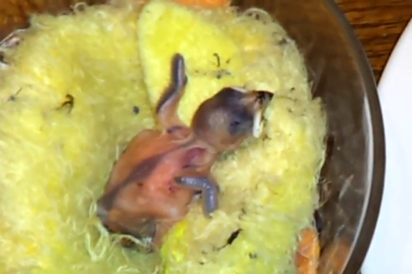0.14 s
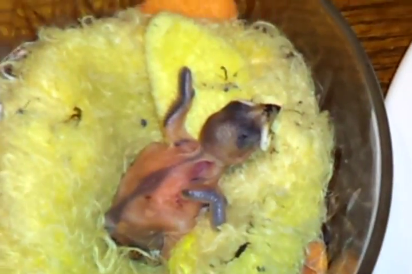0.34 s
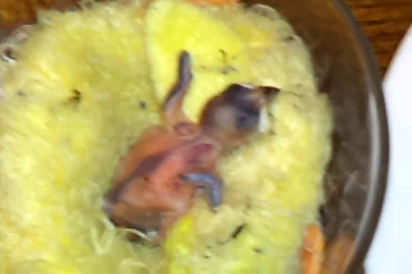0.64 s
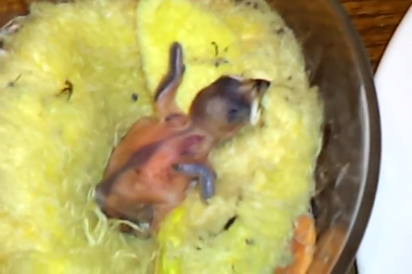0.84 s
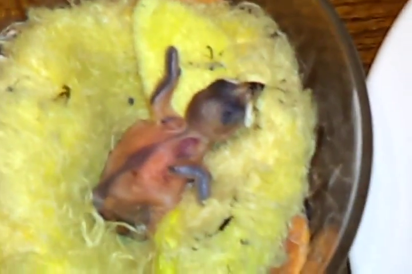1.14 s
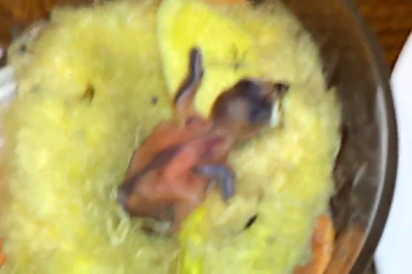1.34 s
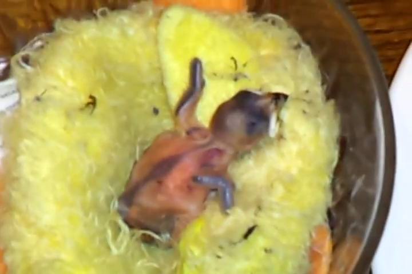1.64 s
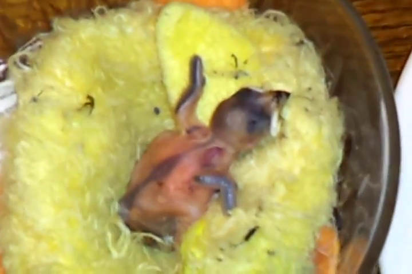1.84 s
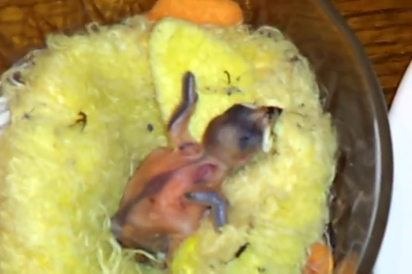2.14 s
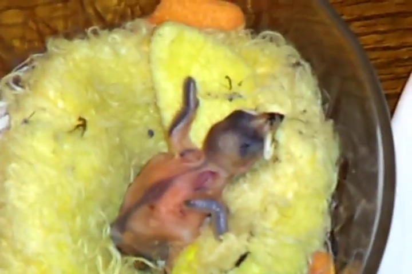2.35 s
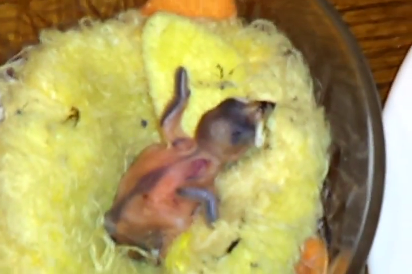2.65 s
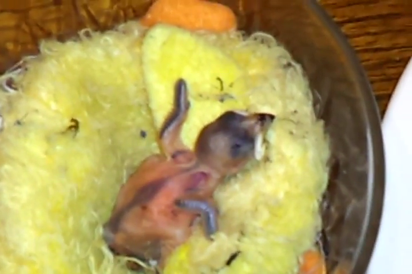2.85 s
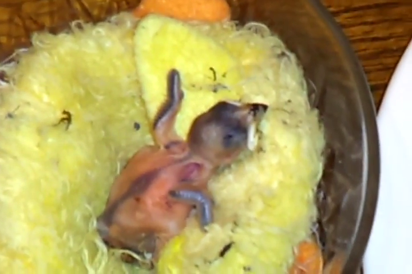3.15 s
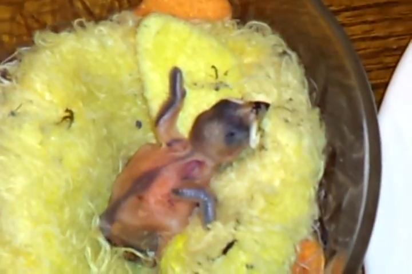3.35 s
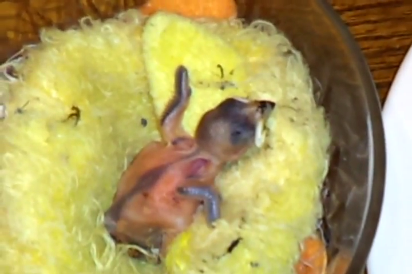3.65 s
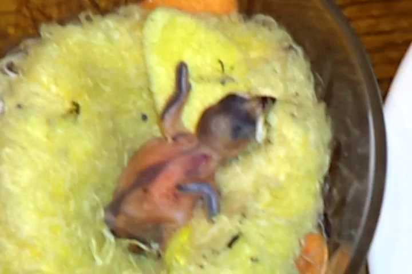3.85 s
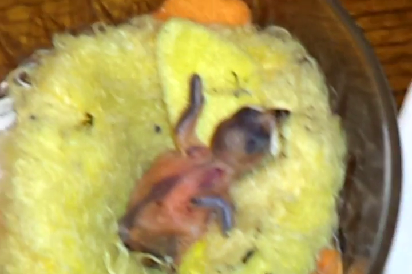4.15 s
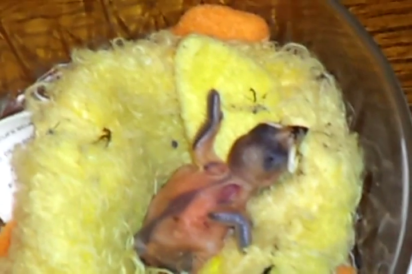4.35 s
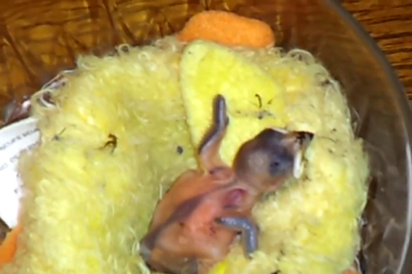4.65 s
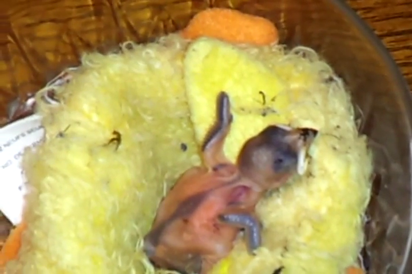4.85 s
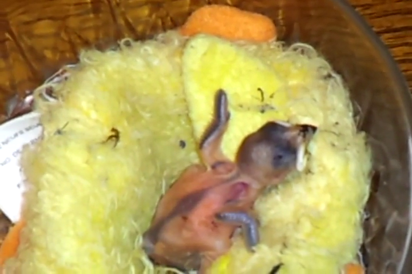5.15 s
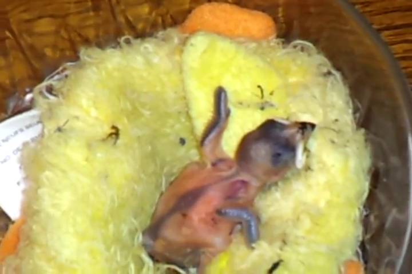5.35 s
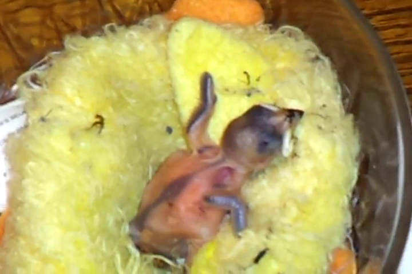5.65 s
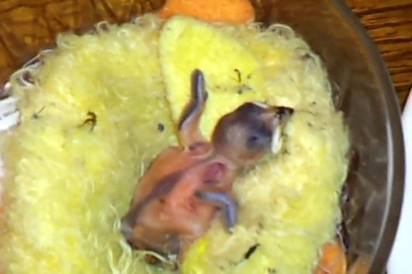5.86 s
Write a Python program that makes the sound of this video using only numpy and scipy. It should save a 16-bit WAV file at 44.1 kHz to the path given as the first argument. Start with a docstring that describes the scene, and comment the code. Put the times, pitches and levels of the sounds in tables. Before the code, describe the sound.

Close up in a hissy, humming room, a spoon strikes a small china dish with loud, bright, overloaded clinks. A nestling gives short, thin peeps about once a second. Dry ticks and a harsh scratch follow, then a busy patch of softer clinks, scrapes and wooden table knocks. Near the end comes another hard clink, then a scrape and a utensil set down with a knock.

```python
"""Spoon and china dish on a table

A spoon clinks, trembles and scrapes in a small dish, heard as dying modes excited by contact forces.
Knocks ring a wooden table; dry ticks and scratches close by are short band-limited snaps.
A nestling bird whistles thin, two-voiced peeps; hiss and a wavering hum fill the reflecting room.
The hardest clinks overload the recorder, which clips and band-limits them.
"""
import sys
import numpy as np
from scipy import signal
from scipy.fft import rfft, irfft, next_fast_len
from scipy.io import wavfile

SR = 44100
rng = np.random.default_rng(int(sys.argv[2]) if len(sys.argv) > 2 else 0)


def dump(signal):
    """Clip the signal to [-1, 1] and save it as 16-bit WAV at the path in sys.argv[1]."""
    limited = np.clip(np.atleast_2d(signal).T, -1, 1)
    pcm = np.round(limited * 32767).astype(np.int16)
    wavfile.write(sys.argv[1], SR, pcm)


N = 265085
RING_TIME = np.arange(SR // 2) / SR  # time axis of every ring [s]

# hum of the room: (frequency [Hz], rms level [dB], unsteadiness [ratio])
HUM_TONES = [(41.3, -43, .035), (97.2, -54.5, .8), (122.3, -47.5, 0.33), (158.5, -58, 0.87),
             (239.5, -48.5, 0.87), (332, -55, 0.8)]
# spectral shape of the hiss: (frequency [Hz], relative level [dB])
HISS_SHAPE = [(15, -11), (30, -15.5), (55, -1.5), (70, -2.5), (100, -1.5), (200, -2), (340, -0.5),
              (450, -5), (1200, -9), (1520, -6), (2000, -10.5), (4600, -8.5), (5500, -12), (7400, -35),
              (9000, -82)]
# decay of the room's reflections: (frequency [Hz], t60 [s])
ROOM_DECAY = [(200, 0.23), (1500, 0.34), (4000, 0.37), (7000, 0.33)]
# whistles of the bird, before the beak and the rasp shape them: (start [s], end [s], top pitch [Hz],
# scoop up to the top [Hz], final fall [Hz], level [dB], opening rasp [ratio])
PEEPS = [(.495, .615, 6680, 0, 2050, -37, .3), (1.315, 1.41, 6810, 0, 300, -39, 0),
         (1.35, 1.499, 6290, 80, 1580, -34.5, .05), (2.637, 2.805, 6920, 900, 1400, -36.5, .3),
         (2.637, 2.685, 6050, 200, 50, -43, .9), (2.697, 2.708, 5930, 0, 30, -30, 0),
         (2.782, 2.83, 6250, 0, 1200, -38.5, .2), (3.8635, 4.074, 6150, 600, 1150, -37, 1.2),
         (3.88, 4, 6720, 350, 200, -43, .4), (4.994, 5.04, 6080, 0, 500, -37.5, .4),
         (5.035, 5.173, 5920, 400, 200, -37.5, .4), (5.043, 5.15, 6900, 450, 450, -45, .2),
         (5.215, 5.322, 5570, 0, 70, -42, .05)]
# bands of friction noise: dry scratches close by, but the 2630 Hz row belongs to the spoon scraping the dish:
# (start [s], end [s], rms level at start [dB], rms level at end [dB], centre [Hz], width [Hz])
FRICTION_BANDS = [(1.2408, 1.2570, -6, -5, 4430, 2100), (1.05, 1.066, -42, -32, 5000, 1800),
                  (2.4985, 2.513, -28.5, -36.5, 4600, 1204), (5.82, 5.89, -31, -28, 4900, 1000),
                  (5.821, 5.885, -37, -36, 2630, 500), (5.945, 6.014, -36, -20, 4800, 1000)]
# dry ticks close by: (time [s], peak level [dB])
TICKS = [(.5994, -15.5), (.9134, -26.5), (1.0407, -24), (1.0475, -21.5), (1.076, -10), (1.309, -27),
         (1.312, -20), (2.233, -26), (2.3922, -23), (2.4047, -6), (2.473, -22.5), (5.778, -18)]
# modes of the wooden table: (frequency [Hz], level [dB], t60 [s])
TABLE_MODES = [(226.9, 1.5, 0.31), (251, -17, 0.1), (330.7, 0.5, .2), (380.6, 0, 0.14), (449, 2, 0.073),
               (534.5, -4, 0.072), (665, -10, 0.11), (817, -1.5, 0.087), (888, 3, 0.037), (965, -3, 0.05),
               (1141, -25, .1)]
# knocks on the table: (time [s], level [dB], brightness [dB/octave], wait between rebounds [s])
KNOCKS = [(2.251, -37.5, 1, .032), (2.856, -29.5, 1, .034), (3.046, -28, .5, .025), (3.154, -39, -4, .03),
          (3.3, -41, -5, .03), (3.398, -37, -3, .045), (5.887, -18.5, 11, .0175)]
# a utensil set down with the last knock: (time [s], level [dB])
SET_DOWN = (5.8868, -12.5)
# modes of that utensil: (frequency [Hz], level [dB], t60 [s])
UTENSIL_MODES = [(1480, -11, 0.13), (2006, -4, 0.08), (1997, -2, 0.045), (2410, -13, .08), (2627, 5, 0.033),
                 (2830, 5, 0.014), (3210, -5, 0.027), (3650, -11, .2), (4980, -7.5, 0.11),
                 (6100, -17, 0.049)]
# modes of the undamped dish, some in close pairs that beat: (frequency [Hz], level [dB], t60 [s])
DISH_MODES = [(1495.6, -3, 0.19), (1547, 0.5, 0.083), (1644, -21.5, 0.1), (2493, -20, 0.18),
              (2596, -13.5, 0.14), (2624, -7, 0.028), (3620, -29.5, 0.11), (4106, -9.5, 0.04),
              (4052, 0.5, 0.07), (4370, -16, 0.14), (4700, -28, .045), (4900, -21.5, 0.041),
              (4990, -15, .06), (5285, 1, 0.073), (5326, -14, .1), (5387, -16, 0.11), (6036, -10.5, 0.11),
              (6114, -13, 0.14), (6890, -16, .13), (7154, -12, 0.093)]
# faint touches of the trembling spoon; the first row stands for a faint dying ring of the dish:
# (start [s], end [s], middle level [dB], brightness [dB/octave])
FAINT_TOUCHES = [(.02, .06, -36, -5), (.89, .96, -35, -5), (1.69, 1.82, -35, -6), (2.16, 2.4, -39, 0),
                 (2.58, 2.9, -36, -2), (3.52, 3.82, -37, -1)]
# spoon dragged along the dish: (start [s], end [s], level [dB], brightness [dB/octave],
# place of contact in favour of the 4 kHz modes [dB])
SCRAPES = [(2.798, 2.887, -42, -2, 0), (2.945, 2.998, -37.5, -4.5, 1), (3.026, 3.097, -33.5, 1, 2),
           (3.135, 3.203, -32, -5, 7), (3.33, 3.346, -25, 1.6, 9), (3.419, 3.489, -32.5, -5, -1.7),
           (3.475, 3.497, -29.5, 2.8, -3), (3.609, 3.638, -30.5, 1.2, 1), (5.521, 5.541, -21, 3.5, 11),
           (5.8, 5.907, -28.5, .4, 6)]
# spoon striking the dish: (time [s], strength [dB], brightness [dB/octave],
# place of contact in favour of the 4 kHz modes [dB], contact time [s], damping by the resting spoon [dB/s])
CLINKS = [(.2652, -1, .2, 2.6, .0007, 30), (.4491, 1.5, 1.6, 4, .00045, 185),
          (.4609, -6.5, -1.2, -4.5, .0003, 127), (.8795, -30, -7, 1.5, .001, 500),
          (1.482, -19, -4, 1.5, .0016, 1500), (2.328, -31, -2, -3, .0025, 500),
          (2.947, -24.5, -6.5, -5, .0025, 195), (3.048, -37, 7, -2, .0025, 450),
          (3.156, -18.5, -7, 1.6, .0037, 800), (3.242, -28, -5, -1, .003, 500),
          (3.3287, -23, -.3, 1, .00075, 700), (3.5122, -16.5, 1.2, -6.5, .00055, 850),
          (3.6116, -28, -.8, 1.5, .0006, 400), (3.7088, -19, -5, 5, .002, 600),
          (3.7182, -19, 1, -3, .0009, 650), (3.742, -18, -9.5, 5, .0025, 400),
          (4.4224, -30, 0, -2, .0017, 800), (5.5264, 3, -4, 3.5, .0026, 2400),
          (5.804, -25, 4, -.5, .0013, 900), (5.8355, -19, -3.5, -4, .0005, 1100)]

HISS_DB = -39.5  # rms
# the pitch scoops up, holds, then bends into a steady fall
SCOOP_S, BEND_S, FALL_HZ_PER_S = .025, .011, 17000
BEAK_HZ, BEAK_WIDTH_HZ = 5450, 1500  # a whistle is loudest as it passes this resonance
# the rasp opens with a push and dies away to a nearly clear tone
RASP_S, CLEAR_ROUGH, RASP_PUSH_DB, PUSH_S = .075, .04, 6, .012
TICK_HZ, TICK_T60_S = 4650, .0035  # of a tick at -10 dB
TICK_HZ_PER_DB, TICK_STRETCH_DB = 20, 14  # weaker ticks are higher, and twice as long per TICK_STRETCH_DB
REBOUND_DB, REBOUND_DULLING_DB = -6, 6.5  # first rebound; dulling of each one, per octave
USUAL_CONTACT_S = .001
CRACK_DB, SECOND_MODES_DB, TOP_MODES_DB = -12, 0, -12  # at the usual contact time
SHARP_CRACK_DB, SHARP_SECOND_DB, SHARP_TOP_DB = 5.5, 3, 6.2  # added by each halving of the contact time
PLACE_TRADE = .8  # share of the gain at 4 kHz that the 5.3 kHz modes lose
TOUCHES_PER_S, TOUCH_SPREAD_DB, TOUCH_PLACE_DB = 30, 2.5, 3
TOUCH_CONTACT_S, TOUCH_DAMPING_DB_PER_S = .002, 600
INPUT_EDGE_HZ, OUTPUT_EDGE_HZ = 7650, 17000  # band limits after each clipping stage


def amp(db):
    """Definition of the decibel: level to amplitude ratio."""
    return 10 ** (np.asarray(db) / 20)


def evened(x):
    """Normalisation of power: scales to rms 1."""
    return x / np.sqrt(np.mean(x ** 2) + 1e-20)


def read(points, hz):
    """Interpolation of a table along a logarithmic frequency axis."""
    f, value = np.transpose(points)
    return np.interp(np.log(hz + 1), np.log(f + 1), value)


def add(mix, s, sound):
    """Superposition: mixes a sound in at time s."""
    part = mix[round(s * SR):][:len(sound)]
    part += sound[:len(part)]


def wobble(size, hz):
    """Random modulation: Gaussian low-passed noise, its changes mostly slower than hz."""
    span = next_fast_len(max(size, len(RING_TIME)))
    f = np.fft.rfftfreq(span, 1 / SR)
    spectrum = rfft(rng.standard_normal(span)) * np.exp(-(f / hz) ** 2)
    return evened(irfft(spectrum, span))[:size]


def band(x, hz, width_hz):
    """Band-pass filtering: a broad resonance with steep skirts."""
    low = np.hypot(hz, width_hz / 2) - width_hz / 2  # hz is the geometric centre
    return signal.sosfilt(signal.butter(2, [low, low + width_hz], "bandpass", fs=SR, output="sos"), x)


def ring(modes, colour_db=0):
    """Modal superposition: a struck object rings in dying sines, weighted by colour_db."""
    hz, db, t60 = np.transpose(modes)
    decay = np.exp(-np.log(1000) * RING_TIME / t60[:, None])
    return amp(db + colour_db) @ (decay * np.sin(2 * np.pi * hz[:, None] * RING_TIME))


def background():
    """Stationary noise and modulated tones: hiss and the wavering hum of an appliance."""
    f, t = np.fft.rfftfreq(N, 1 / SR), np.arange(N) / SR
    hiss = irfft(rfft(rng.standard_normal(N)) * amp(read(HISS_SHAPE, f)), N)
    air = amp(HISS_DB) * evened(hiss)
    for hz, db, unsteady in HUM_TONES:
        sway = 1 + unsteady * (wobble(N, 5) + 1j * wobble(N, 8.3))  # sways level and phase
        tone = (sway * np.exp(2j * np.pi * (hz * t + rng.random()))).real
        air += amp(db) * evened(tone)
    return air


def room(x, early_db=0, early_t60=0.092):
    """Reverberation: strong reflections from things on the table, then the walls, each band at its own decay."""
    arrivals = rng.random(len(RING_TIME)) < 3000 / SR
    taps = rng.choice([-1., 1.], len(RING_TIME)) * arrivals * (RING_TIME > .005)
    taps = taps * (1 + amp(early_db - 60 * RING_TIME / early_t60))
    hz, t, z = signal.stft(taps, SR, nperseg=256)
    tail = signal.istft(z * amp(-60 * t / read(ROOM_DECAY, hz)[:, None]), SR, nperseg=256)[1]
    return signal.fftconvolve(x, tail / np.linalg.norm(tail))[:N]


def peep_pitch(t, top_hz, scoop_hz, fall_hz):
    """Frequency glide: a scoop up to the top, then a rounded bend into a slide that ends fall_hz lower."""
    bend_hz = FALL_HZ_PER_S * BEND_S
    slide = bend_hz * np.log1p(np.expm1(fall_hz / bend_hz) * np.exp((t - t[-1]) / BEND_S))
    return top_hz - scoop_hz * np.exp(-t / SCOOP_S) - slide


def nestling(jitter=.05, flutter_db=1.0, rough_db=4, attack_s=.002, release_s=.006):
    """Self-sustained oscillation: each side of the syrinx whistles a near sine, which rasps until it steadies."""
    out = np.zeros(N)
    for start, end, top_hz, scoop_hz, fall_hz, db, rasp in PEEPS:
        t = np.arange(0, end - start, 1 / SR)
        hz = peep_pitch(t, top_hz, scoop_hz, fall_hz)
        rough = CLEAR_ROUGH + rasp * np.exp(-t / RASP_S)
        turns = np.cumsum(hz * (1 + jitter * rough * wobble(len(t), 500))) / SR
        beak = 1 / (1 + (2 * (hz - BEAK_HZ) / BEAK_WIDTH_HZ) ** 2)
        push_db = RASP_PUSH_DB * rasp * np.exp(-t / PUSH_S)
        waver_db = (flutter_db + rough_db * rough) * wobble(len(t), 140)
        level = beak * amp(db + push_db + waver_db)
        gate = np.clip(np.minimum(t / attack_s, (t[-1] - t) / release_s), 0, 1)
        add(out, start, np.sqrt(2) * level * gate * np.sin(2 * np.pi * turns))
    return out


def friction(slips_per_s=2500):
    """Stick-slip friction: dense snaps that stop dead, as dry scratches and one band of the spoon's scrape."""
    out = np.zeros(N)
    for start, end, first_db, last_db, hz, width_hz in FRICTION_BANDS:
        size = max(round((end - start) * SR), 200)
        slips = rng.choice([-1, 1], size) * (rng.random(size) < slips_per_s / SR)
        scale = amp(np.linspace(first_db, last_db, size)) / (band(slips, hz, width_hz).std() + 1e-9)
        add(out, start, band(np.pad(slips * scale, (0, size)), hz, width_hz))
    return out


def ticks(width_hz=3600):
    """Impulse response: snaps of a few cycles; the strong ones are lower and shorter."""
    out = np.zeros(N)
    for s, db in TICKS:
        weaker_db = -10 - db
        hz = TICK_HZ + TICK_HZ_PER_DB * weaker_db
        t60 = TICK_T60_S * 2 ** (weaker_db / TICK_STRETCH_DB)
        snap = band(ring([(hz, 0, t60)]), hz, width_hz)
        add(out, s, amp(db) * snap / abs(snap).max())
    return out


def knocks(thud_db=-1, thud_t60=0.075, settling=1.5, count=3):
    """Impact and rebound: low table modes and a dull thud answer each contact; a utensil rings on the last knock."""
    out = np.zeros(N)
    octaves = np.log2(np.transpose(TABLE_MODES)[0] / 500)
    rise = 1 - np.exp(-RING_TIME / 0.0027)
    for s, db, brightness, wait in KNOCKS:
        for k in range(count):  # the knock, then its rebounds
            noise = rng.standard_normal(len(RING_TIME))
            thud = evened(band(noise, 520, 700)) * amp(thud_db - 60 * RING_TIME / thud_t60)
            wood = ring(TABLE_MODES, (brightness - k * REBOUND_DULLING_DB) * octaves)
            add(out, s + k * wait, amp(db + REBOUND_DB * k ** settling) * (wood + thud) * rise)
    set_down_s, set_down_db = SET_DOWN
    utensil = ring(UTENSIL_MODES) * (1 - np.exp(-RING_TIME / 0.00045))
    add(out, set_down_s, amp(set_down_db) * utensil)
    return out


def sharpness(contact):
    """Contact time and bandwidth: counts halvings of the usual contact time."""
    return np.log2(USUAL_CONTACT_S / contact)


def dish_ring(brightness, place_db, damping, contact, grip=0.49):
    """Modal excitation: place picks modes, slow contact loses upper ones, a resting spoon damps."""
    hz, db, t60 = np.transpose(DISH_MODES)
    second_db = SECOND_MODES_DB + SHARP_SECOND_DB * sharpness(contact)
    high_db = -PLACE_TRADE * place_db
    top_db = place_db + TOP_MODES_DB + SHARP_TOP_DB * sharpness(contact)
    # mode weights: (frequency [Hz], level [dB])
    weights = [(1750, 0), (2350, second_db), (2800, second_db), (3850, place_db), (4150, place_db),
               (4400, 0), (4900, 0), (5200, high_db), (5500, high_db), (5900, top_db)]
    # the low modes are damped most
    damped_t60 = 60 / (60 / t60 + damping * (hz[0] / hz) ** grip)
    colour_db = read(weights, hz) + brightness * np.log2(hz / hz[0])
    return ring(np.transpose([hz, db, damped_t60]), colour_db)


def blow(db, brightness, place_db, contact, damping,
         crack_t60=0.028, crack_hz=3000, crack_width_hz=3900, push_db=-30):
    """Impact of finite duration: a crack, the dish's ring and a small push into the table build over the contact."""
    crack_db = CRACK_DB + SHARP_CRACK_DB * sharpness(contact)
    noise = band(rng.standard_normal(len(RING_TIME)), crack_hz, crack_width_hz)
    crack = evened(noise) * amp(crack_db - 60 * RING_TIME / crack_t60)
    push = amp(push_db) * ring(TABLE_MODES) * amp(-250 * RING_TIME)
    sound = dish_ring(brightness, place_db, damping, contact) + (crack + push) * amp(-damping * RING_TIME)
    return amp(db) * sound * (1 - np.exp(-(RING_TIME / contact) ** 2))


def faint_touches():
    """Repeated light impact: weak blows at uneven times, each on another place; the first few stand for a dying ring."""
    out = np.zeros(N)
    for start, end, db, brightness in FAINT_TOUCHES:
        for s in np.arange(start, end, 1 / TOUCHES_PER_S):
            strength, place = rng.standard_normal(2)
            touch = blow(db + TOUCH_SPREAD_DB * strength, brightness, TOUCH_PLACE_DB * place,
                         TOUCH_CONTACT_S, TOUCH_DAMPING_DB_PER_S)
            add(out, s + rng.uniform(-.5, .5) / TOUCHES_PER_S, touch)
    return out


def scrapes(slips_per_s=1500, damping=300, contact=.0035, grit_db=-21):
    """Stick-slip excitation of a resonator: uneven slips of the spoon keep the lightly damped dish ringing."""
    out = np.zeros(N)
    for start, end, db, brightness, place_db in SCRAPES:
        size = max(round((end - start) * SR), 200)
        slips = rng.standard_normal(size) * (rng.random(size) < slips_per_s / SR)
        slips = slips * signal.windows.tukey(size, .5)
        sound = evened(signal.fftconvolve(slips, dish_ring(brightness, place_db, damping, contact)))
        grit = band(np.pad(slips, (0, len(RING_TIME) - 1)), 2500, 1700)
        sound += amp(grit_db) * evened(grit)
        add(out, start, amp(db) * sound * np.sqrt(size / len(sound)))  # level refers to the drag's length
    return out


def clinks():
    """Impact excitation: the distinct blows of the spoon on the dish."""
    out = np.zeros(N)
    for s, *stroke in CLINKS:
        add(out, s, blow(*stroke))
    return out


def scene(wet_db=-13, close_wet_db=-34):
    """Direct and reverberant sound: the tableware excites the room; the close sounds stay nearly dry."""
    air = background()
    close = nestling() + friction() + ticks()
    ware = knocks() + faint_touches() + scrapes() + clinks()
    reflected = room(amp(wet_db) * ware + amp(close_wet_db) * close)
    return (ware + close + reflected + air)[None]


def low_pass(x, hz):
    """Band limitation: a steep linear-phase filter."""
    return signal.oaconvolve(x, signal.firwin(201, hz, window=("kaiser", 9), fs=SR)[None], "same")


def record(dry, mic_top_hz=7000, input_limit=0.9, output_limit=1.0):
    """Overload: a dull microphone, a clipping narrow-band input; peaks that overshoot its filter clip again."""
    dulled = signal.sosfilt(signal.butter(5, mic_top_hz, fs=SR, output="sos"), dry)
    narrow = low_pass(np.clip(dulled, -input_limit, input_limit), INPUT_EDGE_HZ)
    return low_pass(np.clip(narrow, -output_limit, output_limit), OUTPUT_EDGE_HZ)


dry = scene()
out = record(dry)
dump(out)
```